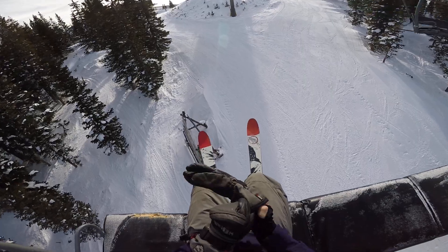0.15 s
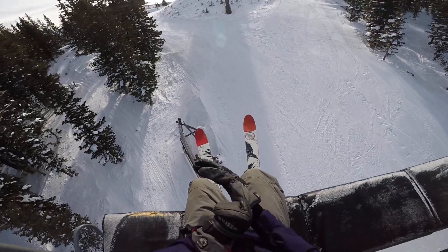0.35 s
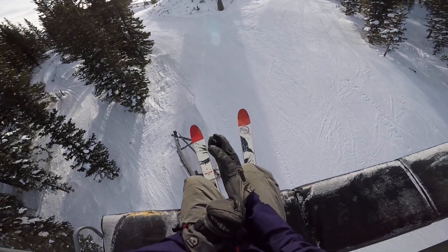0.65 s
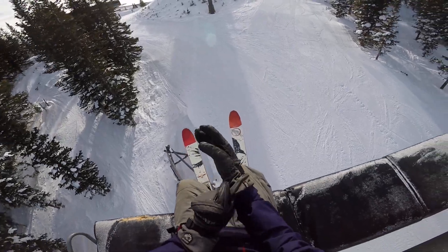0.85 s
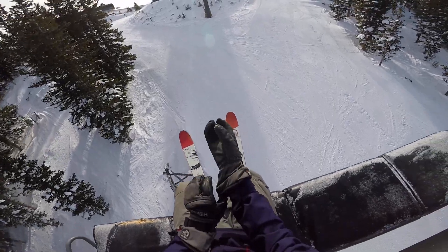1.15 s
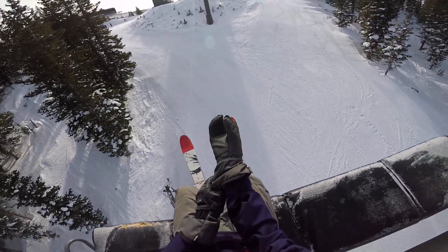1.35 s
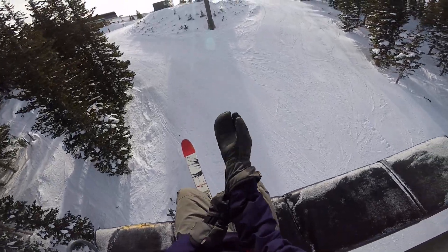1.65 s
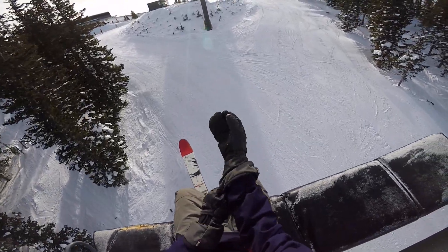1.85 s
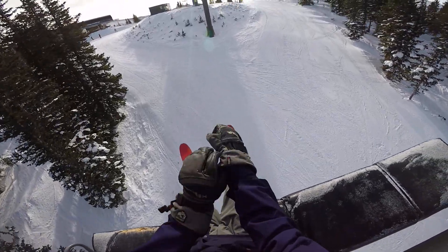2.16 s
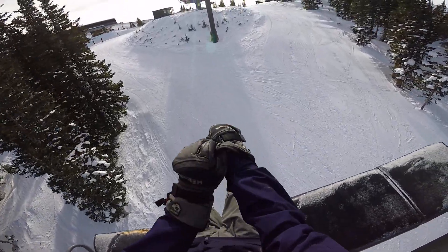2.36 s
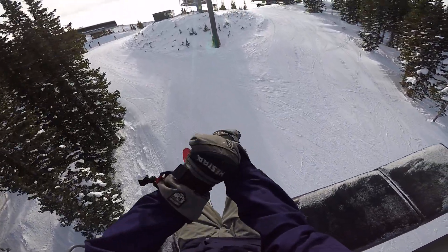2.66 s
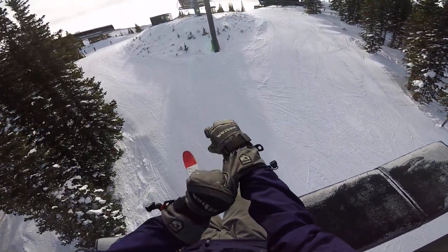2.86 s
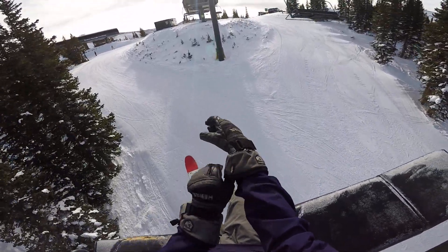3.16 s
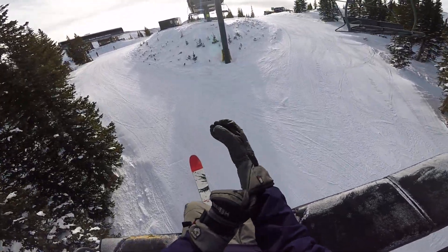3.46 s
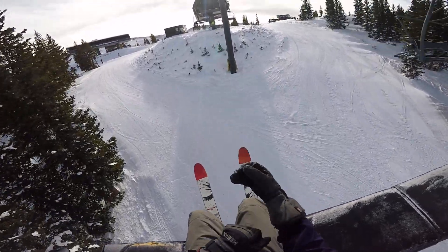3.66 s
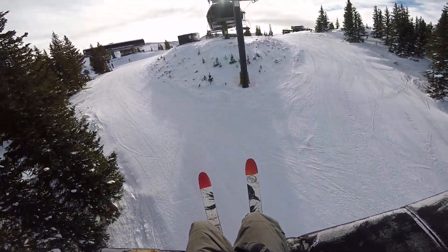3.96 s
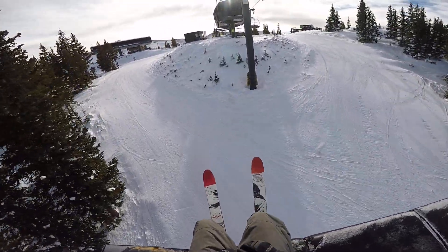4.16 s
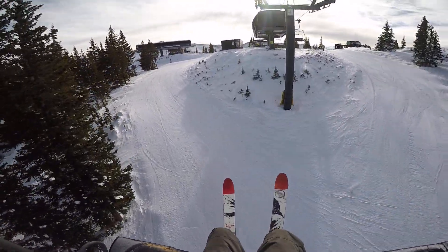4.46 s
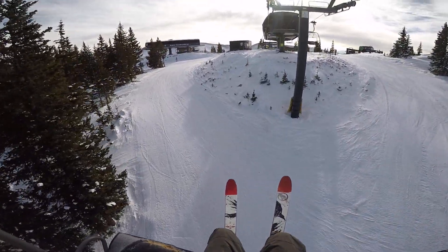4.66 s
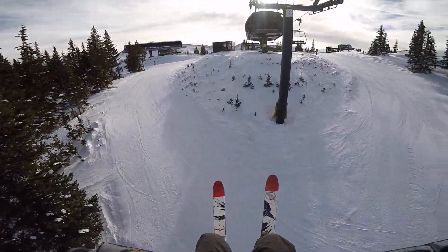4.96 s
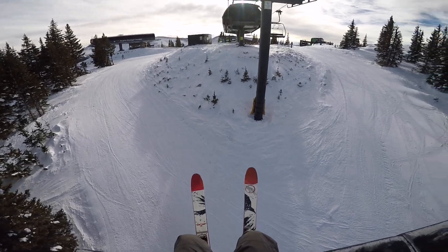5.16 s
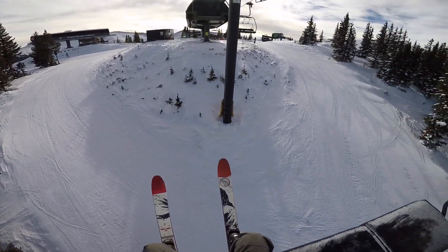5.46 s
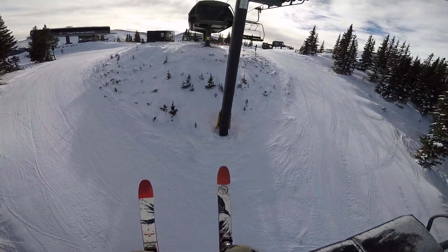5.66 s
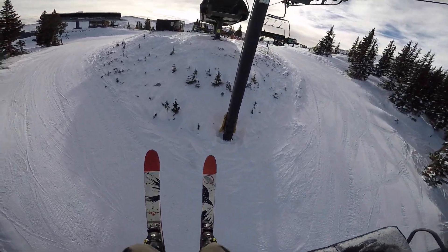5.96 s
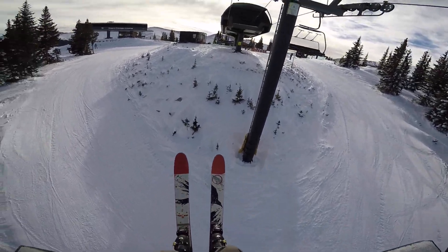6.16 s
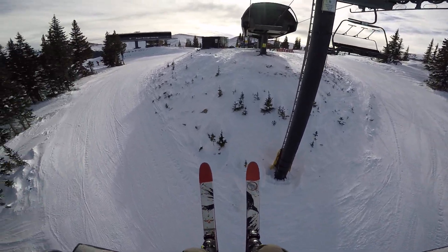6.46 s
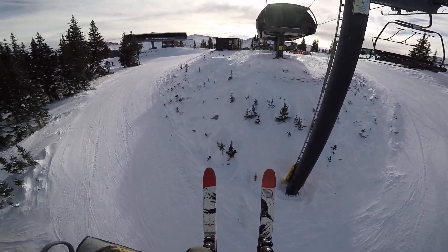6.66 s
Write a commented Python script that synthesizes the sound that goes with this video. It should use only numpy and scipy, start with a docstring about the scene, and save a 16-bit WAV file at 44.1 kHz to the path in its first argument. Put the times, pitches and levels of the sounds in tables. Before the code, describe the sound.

A chairlift hums steadily on its cable while low wind thumps past, and a tower's wheels draw closer with growing hiss and clatter.

```python
"""On a chairlift in the open air: heard from a chair that nears a tower.
The moving cable hums down the hanger as wavering tones; wind strikes the microphone as lumps of low noise.
The tower's sheaves (cable wheels) rumble, hiss, ring and scrub ever closer: noise shaped by resonances.
Rasps, ticks, clacks and groans are short noise bursts. The sound starts in mono and opens to stereo."""
import sys
import numpy as np
from scipy import signal
from scipy.fft import rfft, irfft
from scipy.io import wavfile
from scipy.ndimage import uniform_filter1d

SR = 44100
rng = np.random.default_rng(int(sys.argv[2]) if len(sys.argv) > 2 else 0)


def log_audio(samples):
    """Write samples as a 16-bit WAV file to the path given in sys.argv[1]."""
    # one column per channel
    frames = np.atleast_2d(samples).T
    # limit to full scale, then quantise
    limited = np.clip(frames, -1, 1)
    pcm = np.round(limited * 32767).astype(np.int16)
    wavfile.write(sys.argv[1], SR, pcm)


N = 300762
TIME, FREQ = np.arange(N) / SR, np.fft.rfftfreq(N, 1 / SR)


def amp(db):
    """Turns decibels into a gain."""
    return 10 ** (np.asarray(db) / 20)


def unit(x):
    """Scales a signal to an rms of 1."""
    return x / np.sqrt(np.mean(x ** 2) + 1e-20)


def curve(rows, axis=1):
    """Reads one column of a time table at every sample."""
    rows = np.asarray(rows, float)
    return np.interp(TIME, rows[:, 0], rows[:, axis])


def across(points):
    """Joins the points of a frequency table by straight lines on a log-frequency axis."""
    hz, value = np.transpose(points)
    return np.interp(np.log(FREQ + 1), np.log(hz + 1), value)


def drift(rate_hz):
    """Random motion of rms 1 that is too slow to go far above rate_hz."""
    spectrum = rfft(rng.standard_normal(N))
    return unit(irfft(spectrum / (1 + (FREQ / rate_hz) ** 4), N))


def nearness(far_s=2.55, near_s=4.04):
    """0 while the tower is distant, 1 once it is close."""
    return np.clip((TIME - far_s) / (near_s - far_s), 0, 1)


def approach(far_db, near_db, far_s, near_s):
    """A level in dB that moves evenly from its far to its near value as the chair travels."""
    return far_db + (near_db - far_db) * nearness(far_s, near_s)


def fade_in(rise_s):
    """The sound comes up from silence."""
    return 1 - np.exp(-TIME / rise_s)


def swell(s, length):
    """A flat-topped rise and fall around the time s."""
    return np.exp(-(2 * (TIME - s) / length) ** 4)


def lifts(rows):
    """The dB that a table of brief swells adds to a level."""
    return sum(db * swell(s, length) for s, length, db in rows)


def blend(far, close, near):
    """Crossfades two unrelated sounds at even power."""
    return np.sqrt(1 - near) * far + np.sqrt(near) * close


def peak(hz, width):
    """Power response of one steep-sided resonance."""
    return 1 / (1 + ((FREQ - hz) / width) ** 2) ** 2


def steadied(x, span_s):
    """Holds a noise near rms 1 from moment to moment, so that its swells come from the scene."""
    power = uniform_filter1d(np.atleast_2d(x ** 2).mean(0), round(span_s * SR))
    return x / np.sqrt(abs(power) + 1e-20)


# How alike the two microphone ports hear: f/Hz, likeness (0-1)
LIKENESS = [(60, 0.78), (200, 1), (400, 1), (700, 0.78), (1050, 0.742), (1250, 0.066), (1700, 0.34),
            (2800, 0.82), (4200, 0.94), (5200, 0.533), (7500, 0.79), (9500, 0.11)]
# How much stronger the left port is than the right: f/Hz, level/dB
BALANCE = [(50, 19.5), (150, -5), (320, 3.5), (700, 2.5), (1100, 5), (1600, 1), (4200, 2), (5500, 3.5),
           (7000, 5.5), (7800, -3.5), (10000, -4), (14000, 0)]
# How far the left port leads: f/Hz, phase/rad
LEAD = [(700, 0.29), (1000, -0.74), (1600, 0.87), (2500, 0.16), (4000, 0.05), (7400, -0.87), (8800, -1.7)]


def field(gain, drive=1):
    """Coloured noise as the two microphone ports catch it; drive is the strength of what excites it."""
    a, b = rfft(rng.standard_normal((2, N)) * drive)
    same = np.clip(across(LIKENESS), 0, 1)
    tilt = amp(across(BALANCE) / 2)
    right = same * a + np.sqrt(1 - same ** 2) * b
    right *= np.exp(-1j * across(LEAD))
    return irfft(np.array([a * tilt, right / tilt]) * unit(gain), N)


# Cable speed: t/s, factor on every tone's pitch
SPEED = [(0, .997), (1.5, .996), (3, .998), (4.5, 1.001), (5.6, 1.003), (6.3, 1.0), (6.82, .998)]


def tone(hz, waver, waver_hz=3.7, wobble=0.0014):
    """A line that follows the cable's speed and wavers in strength and phase."""
    pitch_hz = hz * curve(SPEED) * (1 + wobble * drift(3.2))
    turns = np.cumsum(pitch_hz) / SR + rng.random()
    sway = 1 + waver * (drift(waver_hz) + 1j * drift(waver_hz))
    sway /= np.sqrt(1 + 2 * waver ** 2)  # same average power for any waver
    return np.sqrt(2) * (sway * np.exp(2j * np.pi * turns)).real


LULL_S, LULL_LENGTH_S = 2.936, 0.99  # middle and length


def lull():
    """Rises to 1 while the sheaves ease off for a moment."""
    return swell(LULL_S, LULL_LENGTH_S)


BEAT_S, BEAT_TOP_S, BEAT_DB = .53, 4.94, 3  # period, a moment when it is strongest, swing up and down
CREST_S, CREST_LENGTH_S, CREST_DB = 6.0, .28, 6  # middle, length, dB added


def drone_level(far_db, near_db, lull_db=0.5):
    """The strands drum louder near the tower, beating slowly, with a slight lift and a late crest (dB)."""
    beat = BEAT_DB * np.cos(2 * np.pi * (TIME - BEAT_TOP_S) / BEAT_S)
    swells = CREST_DB * swell(CREST_S, CREST_LENGTH_S) + lull_db * lull()
    return approach(far_db, near_db, far_s=1.5, near_s=5.4) + beat + swells


DRONE_HZ = 79.1  # before the cable's speed shifts it
# Tones of cable and chair, each with one slow swell: f/Hz, relative level/dB far from the tower,
# the same near it, relative waver, time to emerge t/s, swell middle t/s, swell length t/s, added level/dB
HUM_TONES = [(96, -43.5, -41, .3, .6, 1.0, .5, 2), (142.7, -39.3, -38, .27, .5, 2.3, 1.8, 3),
             (156.5, -47, -37.5, .35, .3, 5.8, 1.2, 3), (192.5, -51, -48, .5, .1, 5.0, 1.0, 2),
             (226.3, -41.5, -41.7, .27, .1, 6.6, .6, 3), (234, -49, -47, .6, .2, 2.6, 1.2, 2),
             (258, -48, -48, .25, .2, 3.9, .8, 3), (363.7, -45.5, -42, .17, .75, 4.7, 1.7, 3),
             (433, -48, -45.7, .2, .25, 6.8, .4, 3), (517, -51, -47.3, .2, .25, 5.6, .7, 4.5)]


def cable(drone_rise_s=1.0):
    """The strand drone and higher tones come down the hanger; the higher ones grow steadier near the tower."""
    near = nearness(far_s=3.34, near_s=4.9)
    unrest = 1.5 - .6 * near
    hum = 0
    for hz, far_db, near_db, waver, rise_s, s, length, db in HUM_TONES:
        level_db = far_db + (near_db - far_db) * near + db * swell(s, length)
        hum = hum + amp(level_db) * fade_in(rise_s) * tone(hz, waver * unrest)
    drone = amp(drone_level(far_db=-37.5, near_db=-28.0)) * fade_in(drone_rise_s)
    drone *= tone(DRONE_HZ, waver=0.2)
    return (hum + drone) * amp([[.5], [-.5]])  # slightly to the left


# Surges in which the air flutters and the chair rumbles: middle t/s, length t/s, relative level/dB
SURGES = [(5.027, 0.25, -25), (5.053, 0.027, -20), (5.49, 0.33, -23), (5.719, 0.23, -25),
          (6.127, 0.29, -24), (6.625, 0.53, -26.5)]


def surging():
    """Strength of the low surges."""
    return sum(amp(db) * swell(s, length) for s, length, db in SURGES)


# How much stronger the wind is on the right port: blowing aslant, then nearly head-on
SLANT_DB, HEAD_ON_DB = 15, 6.5
TURN_FROM_S, TURN_TO_S = 4.35, 4.65
# Colour of the steady wind: f/Hz, relative level/dB
WIND_COLOUR = [(10, -6), (25, 3.5), (48, -4), (70, -5.5), (110, -23.5), (200, -46), (500, -30),
               (1500, -103)]
# Gusts on top of the steady wind: middle t/s, length t/s, added level/dB
GUSTS = [(1.73, 0.33, 4.5), (2.09, 0.22, 8.5), (3.09, 0.069, 3.5), (3.42, 0.082, 0.5), (3.71, 0.072, 3.5),
         (3.9, 0.069, 5.5), (4.07, 0.13, 3), (4.24, 0.044, 7.5), (4.36, 0.072, 5), (5.22, 0.077, 7),
         (5.38, 0.17, 3.5), (5.78, 0.16, 6.5), (6.2, 0.073, 3), (6.4, .09, 5.5), (6.76, 0.13, 4)]
# Colour of the flutter in the surges: f/Hz, relative level/dB
FLUTTER_COLOUR = [(30, -24), (70, 8.5), (120, 8), (180, 4.5), (280, -24.5), (420, -11.5), (900, -69)]


def wind(lumps_db=1.5, shared=0.55, rise_s=0.23):
    """Eddies hit both ports in lumps, partly together, first from the right; surges flutter at each port alone."""
    eddies = unit(irfft(rfft(rng.standard_normal((3, N))) * amp(across(WIND_COLOUR)), N))
    common = np.sqrt(shared) * eddies[2]
    ports = np.array([steadied(common + np.sqrt(1 - shared) * own, span_s=.11) for own in eddies[:2]])
    right_db = approach(SLANT_DB, HEAD_ON_DB, TURN_FROM_S, TURN_TO_S)
    side = amp(right_db * np.array([[-.5], [.5]]))
    strength_db = approach(far_db=-35.5, near_db=-24.5, far_s=2.5, near_s=3.06) + lifts(GUSTS)
    thud = ports * amp(strength_db) * fade_in(rise_s) * side / side.mean(0)
    flutter = unit(irfft(rfft(rng.standard_normal((2, N))) * amp(across(FLUTTER_COLOUR)), N))
    flutter *= surging() * amp([[2.5], [-2.5]])  # stronger on the left
    return (thud + flutter) * unit(amp(lumps_db * drift(42.0)))


RUMBLE_RISE_S = .15
# Colour of the rumble: f/Hz, relative level/dB
RUMBLE_COLOUR = [(30, -48), (70, 7), (120, 0.5), (165, 4.5), (205, -1.5), (240, 4), (280, -26), (400, -15),
                 (800, -16), (2000, -82)]
# Colour of the roar from afar, with its top cut off: f/Hz, relative level/dB
ROAR_FAR = [(120, -8), (280, -1), (400, -6), (500, -5), (610, -5), (720, -10.5), (820, -30), (1400, -30),
            (4000, -40)]
# Colour of the roar near the tower: f/Hz, relative level/dB
ROAR_NEAR = [(120, -104), (280, 4.5), (400, 0), (480, -1.5), (600, -5), (720, -8.5), (900, -10.5),
             (1400, -27), (4000, -82)]


def rolling(surge_db=-10.0, throb_db=0.5, roar_rise_s=0.16):
    """Rubber-lined sheaves roll under the cable: a rumble and a roar that throb together."""
    shake = amp(approach(far_db=-33.5, near_db=-31.5, far_s=.5, near_s=2.5)) * fade_in(RUMBLE_RISE_S)
    rumble = field(amp(across(RUMBLE_COLOUR))) * np.hypot(shake, amp(surge_db) * surging())
    far, close = field(amp(across(ROAR_FAR))), field(amp(across(ROAR_NEAR)))
    roar = blend(far, close, nearness(far_s=0.6, near_s=2.9))
    roar *= amp(approach(far_db=-39.5, near_db=-30.0, far_s=4.76, near_s=8.6)) * fade_in(roar_rise_s)
    return (rumble + roar) * unit(amp(throb_db * drift(23)))


OPEN_S, OPEN_LENGTH_S = 0.895, .035  # when the upper range starts to open, how quickly


def opening(muffled_db, rise_s, length_s=OPEN_LENGTH_S, start_db=-26):
    """Gain of the upper range: it blooms from a faint start, stays muffled for a moment, then eases open."""
    shut = np.exp(-np.maximum(TIME - OPEN_S, 0) / length_s)
    bloom = np.maximum(fade_in(rise_s) ** 1.56, amp(start_db))
    return bloom * amp(muffled_db * shut)


RING_BUILD_S = .11  # the ring opens more slowly than the rest
# Resonances of the sheaves and their frame: f/Hz, width f/Hz, relative level/dB far, the same near
SHEAVE_MODES = [(823, 45, -5, -3), (885, 25, -12, -5), (972, 50, -3, -2.5), (1025, 55, -1.5, -.5),
                (1135, 52, -3, -3.5), (1234, 18, -18, -9), (1407, 32, -17, -10), (1910, 60, -13, -13),
                (2175, 55, -18, -14), (2798, 140, -30, -13), (3540, 130, -26, -18)]
# Jolts that make the sheaves ring louder: middle t/s, length t/s, added level/dB
JOLTS = [(1.66, 0.29, 3.5), (2.4, 0.65, 3), (3.32, 0.18, 5), (3.72, 0.027, 4.5), (4.6, .08, 2.5),
         (5.19, 0.11, 3), (5.41, 0.03, 7)]
# Colour of the rubber scrub far from the tower: f/Hz, relative level/dB
SCRUB_FAR = [(400, -19), (900, -4.5), (1400, -0.5), (1650, -1.5), (1900, -6), (2300, -9), (3000, -15.5),
             (4200, -15), (7000, -55.5)]
# Colour of the rubber scrub near the tower: f/Hz, relative level/dB
SCRUB_NEAR = [(400, -14), (900, 2), (1400, 8), (1900, 7), (2400, 3.5), (3000, 2), (3700, -33), (4600, -5),
              (7000, -31.5)]


def sheaves(ring_lull_db=-3.0, scrub_lull_db=-2.5, shudder_db=1.0, unrest_db=-0.6):
    """Rolling keeps the metal ringing and the rubber scrubbing; both grow as the tower nears."""
    modes = np.array([peak(hz, width) for hz, width, _, _ in SHEAVE_MODES])
    far, close = (field(np.sqrt(amp(db) ** 2 @ modes)) for db in np.transpose(SHEAVE_MODES)[2:])
    ring_db = approach(far_db=-45.5, near_db=-41.5, far_s=4.26, near_s=4.3)
    ring_db = ring_db + ring_lull_db * lull() + lifts(JOLTS) + unrest_db * drift(5.5)
    ring = blend(far, close, nearness()) * amp(ring_db)
    ring *= opening(muffled_db=-10.0, rise_s=0.14, length_s=RING_BUILD_S)
    far, close = field(amp(across(SCRUB_FAR))), field(amp(across(SCRUB_NEAR)))
    scrub = blend(far, close, nearness(far_s=2.33, near_s=4.1))
    scrub_db = approach(far_db=-48.5, near_db=-39, far_s=3.8, near_s=7.9) + scrub_lull_db * lull()
    scrub *= amp(scrub_db) * opening(muffled_db=-4.0, rise_s=0.135)
    return (ring + scrub) * unit(amp(shudder_db * drift(18)))


def gear_level():
    """Gain of the running gear's treble, which grows steadily on the way to the tower."""
    level_db = approach(far_db=-55.0, near_db=-42.5, far_s=1.185, near_s=6.15)
    return amp(level_db) * opening(muffled_db=-2.5, rise_s=0.15)


STRANDS_PER_S, FIRST_STRAND_S = 78.98, .602


def strands():
    """How many strands of the cable have passed since the count began."""
    return (TIME - FIRST_STRAND_S) * STRANDS_PER_S


CHOP_DB = 1.3  # swing by which the strands chop the near hiss
# Colour of the distant hiss: f/Hz, relative level/dB
HISS_FAR = [(1650, -19), (2700, 0), (3150, -21), (3900, 4), (4800, 1.5), (6200, 1), (7400, 1.5), (9000, 1),
            (10500, -5.5), (12500, -11.5), (14000, -21), (15000, -28)]
# Colour of the near hiss: f/Hz, relative level/dB
HISS_NEAR = [(2000, -19.5), (3100, -2.5), (3700, 1), (4200, -3), (4800, -6.5), (5700, 0.5), (6700, -3),
             (7400, -2), (8300, -7.5), (9900, -6.5), (12400, -24), (14200, -26), (15000, -50)]


def hiss(far_db=0.5, near_db=-3.0, far_flicker_db=1.54, near_flicker_db=1.4, lull_db=-4.5):
    """A smooth distant hiss gives way to the grainy one of the running gear, chopped by the passing strands."""
    far_level_db = far_db + far_flicker_db * drift(29) + lull_db * lull()
    chop_db = CHOP_DB * np.sin(2 * np.pi * strands())
    near_level_db = near_db + near_flicker_db * drift(116) + chop_db
    far = field(amp(across(HISS_FAR))) * amp(far_level_db)
    close = field(amp(across(HISS_NEAR))) * amp(near_level_db)
    return blend(far, close, nearness(far_s=2.8, near_s=3.965)) * gear_level()


# Brief rasps and rubs, a few as short as a tick: middle t/s, length t/s, relative level/dB,
# brightness in dB per octave
RASPS = [(0.631, 0.084, -43, -3), (1.039, .014, -49, 5), (1.31, 0.21, -44, -1.5),
         (1.678, 0.054, -42.5, -3.5), (3.291, 0.0067, -33, -2.5), (3.847, 0.11, -35, -2.5),
         (5.422, 0.093, -45, 4.5), (5.661, 0.12, -40.5, 1), (5.82, .05, -56, 5), (5.996, 0.11, -46, 11.5),
         (6.162, 0.05, -46, 4), (6.5, 0.1, -41, 5), (6.578, 0.085, -36, 1), (6.596, 0.05, -32, -4.5)]
# Colour shared by the rasps, before the brightness: f/Hz, relative level/dB
RASP_COLOUR = [(500, 11.5), (1200, 5), (2500, 0), (3800, 1.5), (4800, 0.5), (6000, 2.5), (7500, 1),
               (8600, -2), (10000, -5), (12000, -19.5), (15000, -32)]


def rasps():
    """Brief rasps and rubs flicker in strength, each with its own brightness."""
    octaves = np.log2(np.maximum(FREQ, RASP_COLOUR[0][0]))
    flicker = unit(amp(3.2 * drift(170)))
    return sum(field(amp(across(RASP_COLOUR) + tilt * octaves), amp(db) * swell(s, length) * flicker)
               for s, length, db, tilt in RASPS)


# Small sharp ticks in the noise: t/s, relative level/dB
TICKS = [(0.671, -46), (1.269, -43.5), (6.24, -24), (6.605, -37), (6.619, -32)]
# Colour of the ticks: f/Hz, relative level/dB
TICK_COLOUR = [(400, -16), (1500, 13), (4000, 7), (6500, -12.5), (10000, -14), (15000, -30)]


def ticks(decay_s=0.00106):
    """Single dry ticks start sharply and die at once."""
    drive = sum(amp(db) * (TIME >= s) * np.exp(-abs(TIME - s) / decay_s) for s, db in TICKS)
    return field(amp(across(TICK_COLOUR)), drive)


KNOCK_SPREAD_DB, LIMP_DB = 4, 2.5  # differences by chance, and strong and weak in turn


def rattle():
    """A loose part knocks once for each passing strand, unevenly and often strong and weak in turn."""
    count = np.floor(np.maximum(strands(), 0))
    chance_db = KNOCK_SPREAD_DB * np.minimum(rng.standard_normal(N), 1)
    limp_db = LIMP_DB * np.tanh(drift(3.9)) * np.cos(np.pi * count)
    knocks = np.diff(count, prepend=0)  # 1 where a new strand arrives
    return knocks * amp(chance_db + limp_db) * nearness(far_s=.8, near_s=1.2)


CLACK_RISE_S = .0005


def clack_power(decay, chatter_s=.0056, after=.88):
    """Power of one clack: the parts chatter for a few milliseconds, let go, and ring out."""
    t = np.arange(SR // 10) / SR
    late = t - chatter_s * rng.uniform(.9, 1.3)
    ring_out = after ** 2 * np.exp(-2 * abs(late) / decay)
    return np.minimum(t / CLACK_RISE_S, 1) * np.where(late < 0, 1, ring_out)


# The clacks' brightest ring wanders: t/s, f/Hz
RING_PITCH = [(2.5, 7480), (4.1, 7420), (4.35, 7170), (5.3, 7180), (5.6, 7350), (6.1, 7400), (6.5, 7100),
              (6.82, 7300)]


def wandering_ring(drive, width_hz=330):
    """A bright resonance, shifted in frequency so that it follows its pitch curve."""
    hz = curve(RING_PITCH)
    ring = signal.hilbert(field(np.sqrt(peak(hz.mean(), width_hz)), drive))
    return (ring * np.exp(2j * np.pi * np.cumsum(hz - hz.mean()) / SR)).real


CLACK_DECAY_S, SMALL_DECAY_S = .0075, .003  # time for the ring to fall by a factor e: loud clacks, small ones
CLACK_RING_DB = -11.5  # gain of the fixed resonances
# Loudest dry clacks of the tower's running gear: t/s, relative level/dB
CLACKS = [(0.984, -48), (1.186, -39.5), (1.339, -41.5), (1.465, -40.5), (1.501, -42), (1.68, -41),
          (1.736, -41), (1.842, -42), (1.869, -41), (2.172, -38.5), (2.222, -44.5), (2.454, -47),
          (2.475, -41), (2.609, -46), (2.658, -38), (2.674, -45), (2.687, -43), (2.699, -41), (2.789, -46),
          (2.894, -37), (2.919, -37), (2.97, -45), (2.994, -43), (3.083, -39), (3.097, -41), (3.262, -39.5),
          (3.282, -41), (3.304, -41), (3.368, -40.5), (3.386, -43), (3.414, -38), (3.426, -39),
          (3.437, -34), (3.463, -37), (3.54, -39.5), (3.603, -36), (3.619, -35), (3.641, -35.5),
          (3.708, -30.5), (3.741, -41), (3.769, -43), (3.837, -39), (3.929, -36.5), (3.947, -37),
          (3.981, -37), (3.997, -34), (4.022, -38), (4.034, -37), (4.045, -35), (4.059, -36),
          (4.072, -33.5), (4.095, -49), (4.107, -46), (4.12, -39), (4.211, -39), (4.226, -38),
          (4.281, -29.5), (4.3, -38), (4.312, -34.5), (4.339, -33.5), (4.411, -40), (4.428, -39),
          (4.49, -31), (4.502, -29), (4.564, -34), (4.582, -30), (4.606, -29.5), (4.63, -28), (4.706, -27),
          (4.722, -26), (4.819, -33.5), (4.832, -29), (4.847, -30.5), (4.879, -30.5), (4.921, -29),
          (4.991, -27.5), (5.075, -27.5), (5.0971, -26), (5.126, -30), (5.158, -26.5), (5.184, -27.5),
          (5.202, -27), (5.23, -28), (5.263, -27), (5.277, -28), (5.3, -32), (5.331, -28.5), (5.389, -26),
          (5.4022, -26), (5.425, -28.5), (5.464, -35.5), (5.551, -28.5), (5.642, -29.5), (5.666, -29),
          (5.691, -33), (5.705, -26), (5.8, -27), (5.821, -27), (5.866, -41), (5.9577, -26), (5.978, -30),
          (5.993, -33), (6.026, -28.5), (6.083, -35), (6.1345, -34), (6.174, -30), (6.215, -27),
          (6.299, -32), (6.336, -24.5), (6.4413, -25.5), (6.4663, -24), (6.478, -27), (6.491, -25),
          (6.502, -21.5), (6.527, -21.5), (6.666, -25.5), (6.719, -28.5), (6.73, -29), (6.755, -25)]
# Colour of a clack's body while the tower is distant: f/Hz, relative level/dB
CLACK_FAR = [(700, 9.5), (2000, -1), (3100, -3), (3900, 3.5), (4800, -1), (6200, 3), (7300, -12),
             (8300, -20), (12000, -22)]
# Colour of a clack's body near the tower: f/Hz, relative level/dB
CLACK_NEAR = [(700, 7), (1500, -3.5), (2800, -0.5), (4000, -5), (4800, -6.5), (5700, 2), (6600, -1.5),
              (7700, 3), (8400, -7), (10000, -13), (12000, -24.5), (15000, -34)]
# Resonances of the clacking parts: f/Hz, width f/Hz, relative level/dB
CLACK_MODES = [(5500, 60, -4), (6281, 55, -1), (6424, 55, -1), (6900, 70, -3)]


def clatter(clack_db=-5.5, early_s=0.0011, grit_db=1.5):
    """Loud clacks over a small rattle, gritty bursts through resonances; the ring stands out from afar."""
    power = np.zeros(N)
    for s, db in CLACKS:
        burst = clack_power(CLACK_DECAY_S)
        part = power[round((s - early_s) * SR):][:len(burst)]
        part += amp(db + clack_db) ** 2 * burst[:len(part)]
    small = rattle() * gear_level() * amp(approach(far_db=-3.0, near_db=1.5, far_s=4.0, near_s=5.4))
    power += abs(signal.oaconvolve(small ** 2, clack_power(SMALL_DECAY_S))[:N])
    drive = np.sqrt(power) * unit(amp(grit_db * drift(470)))
    far, close = field(amp(across(CLACK_FAR)), drive), field(amp(across(CLACK_NEAR)), drive)
    body = blend(far, close, nearness(far_s=2.8, near_s=5.4))
    body *= amp(approach(far_db=2.0, near_db=-1.5, far_s=3.6, near_s=5.7))
    modes = sum(amp(db) ** 2 * peak(hz, width) for hz, width, db in CLACK_MODES)
    fixed_ring = field(np.sqrt(modes), drive) * amp(CLACK_RING_DB)
    moving_ring = wandering_ring(drive) * amp(approach(far_db=-2.5, near_db=-11, far_s=3.7, near_s=5.5))
    return body + fixed_ring + moving_ring


# Brief groans and rings of the metalwork: middle t/s, length t/s, f/Hz, width f/Hz, level/dB
GROANS = [(2.19, .2, 410, 20, -38), (6.355, .05, 990, 90, -34.5), (6.405, .1, 1025, 14, -39),
          (6.495, .07, 995, 90, -40), (6.578, .04, 2160, 30, -42), (6.595, .06, 1410, 12, -41)]


def groan():
    """Single resonances of the metalwork, each briefly excited into a wavering note."""
    return sum(steadied(field(np.sqrt(peak(hz, width))), span_s=0.017) * amp(db) * swell(s, length)
               for s, length, hz, width, db in GROANS)


# Reflections from the chair frame and the rider: delay t/s, gain (a minus sign flips the wave)
REFLECTIONS = [(.0031, .09), (.0053, -.08), (.0079, .09), (.0127, -.08), (.0191, .09)]


def reflected(x):
    """Nearby surfaces add a few weak copies, which ripple the spectrum."""
    copies = sum(gain * np.pad(x, ((0, 0), (round(s * SR), 0)))[:, :N] for s, gain in REFLECTIONS)
    return x + copies


def scene():
    """Cable, tower and wind together."""
    tower = reflected(rolling() + sheaves() + hiss() + rasps() + clatter())
    return cable() + wind() + tower + ticks() + groan()


# The treble opens gradually at first: t/s, cut-off f/Hz
TREBLE_EDGE = [(0, 4000), (.08, 4880), (.16, 6200), (.25, 9450), (.4, 11000), (.85, 13040), (1.1, 22000)]


def brightening(x):
    """A steep low-pass whose edge climbs out of the way."""
    hz, t, z = signal.stft(x, SR, nperseg=512)
    edge = np.interp(t, *np.transpose(TREBLE_EDGE))
    dulled = z / (1 + (hz[:, None] / edge) ** 8)
    return signal.istft(dulled, SR, nperseg=512)[1][:N]


EDGE_HZ = 14900  # upper band limit
# Opening from mono to stereo: t/s, width (0-1)
WIDTH = [(2.36, 0), (2.47, 0.55), (2.72, 1)]


def record(dry, notch_hz=7450, notch_width_hz=900, notch_db=-10.5):
    """A mono pickup, dull at first and notched in the treble, fades over to the stereo pair; then a band limit."""
    notch = amp(notch_db * peak(notch_hz, notch_width_hz))
    mono = brightening(irfft(rfft(dry.mean(0)) * notch, N))
    pair = mono + np.clip(curve(WIDTH), 0, 1) * (dry - mono)
    pair *= fade_in(rise_s=0.0049)
    low_pass = signal.firwin(511, EDGE_HZ, window=("kaiser", 9), fs=SR)
    return signal.oaconvolve(pair, low_pass[None], "same")


dry = scene()
out = record(dry)
log_audio(out)
```